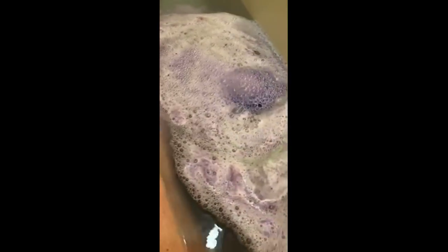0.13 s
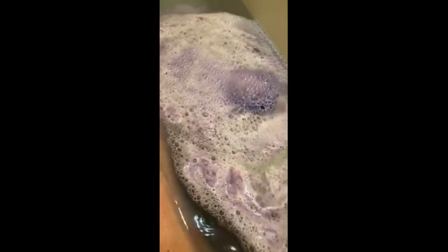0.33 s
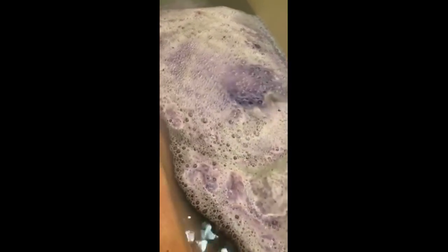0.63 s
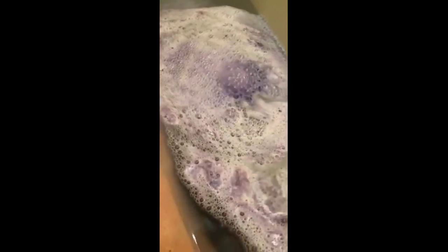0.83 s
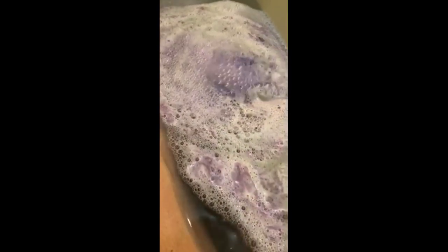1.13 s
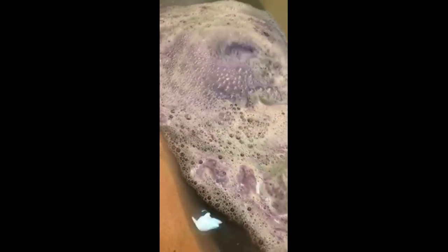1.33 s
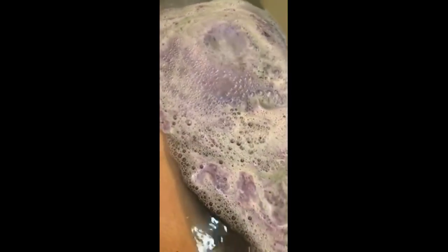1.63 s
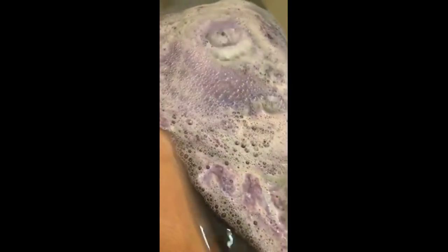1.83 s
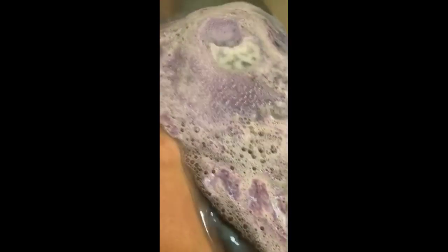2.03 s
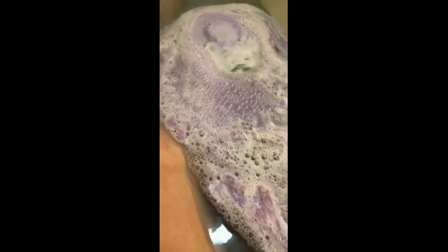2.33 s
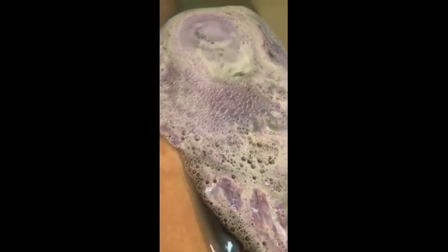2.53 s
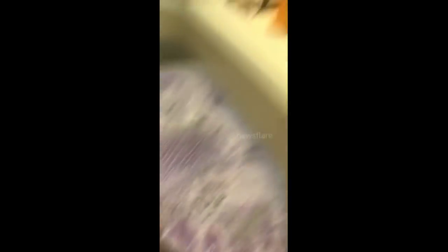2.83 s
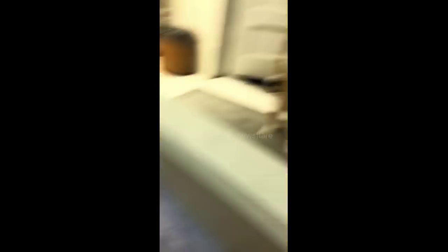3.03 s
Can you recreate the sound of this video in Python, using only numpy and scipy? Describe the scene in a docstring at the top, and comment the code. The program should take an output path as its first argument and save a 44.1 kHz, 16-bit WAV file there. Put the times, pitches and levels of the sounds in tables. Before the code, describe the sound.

A bath bomb fizzes in a foamy tub, with light knocks on the microphone.

```python
"""A foamy tub at home, with a bath bomb fizzing in it. Countless tiny bubbles burst, each ringing
a few cycles: bright on top of the foam, duller within the tub, over a low wash of noise.
A household rumble and a wavering hum lie below. The hand holding the microphone shifts, changing
the colour of the fizz; dull thumps and, late on, two taps and a creak carry through the case."""
import sys
import numpy as np
from scipy import signal
from scipy.fft import rfft, irfft
from scipy.io import wavfile

SR = 44100
rng = np.random.default_rng(int(sys.argv[2]) if len(sys.argv) > 2 else 0)


def transcribe(u):
    """Save the signal u as a 16-bit wav file named by the first command-line argument.

    u: samples, shape (n,) or (channels, n), limited to [-1, 1]; the rate is SR.
    q: integer samples, one column per channel.
    """
    v = np.clip(np.atleast_2d(u).T, -1, 1)
    q = np.round(v * 32767).astype(np.int16)
    wavfile.write(sys.argv[1], SR, q)


N = 140238


def from_db(db):
    """Level to amplitude gain."""
    return 10 ** (np.asarray(db) / 20)


def unit_rms(x):
    """Scale to rms 1."""
    return x / np.sqrt(np.mean(x ** 2) + 1e-20)


def per_sample(rows):
    """Interpolate each column after t/s to one value per sample."""
    times_s, *columns = np.transpose(rows)
    return [np.interp(np.arange(N) / SR, times_s, column) for column in columns]


def drift(corner_hz):
    """Slow random wander, rms about 1."""
    hop, settle = 40, 2000
    pole = np.exp(-2 * np.pi * corner_hz * hop / SR)
    noise = rng.standard_normal(N // hop + settle + 2)
    slow = signal.lfilter([1], [1, -2 * pole, pole * pole], noise)[settle:]
    return np.interp(np.arange(N) / hop, np.arange(len(slow)), unit_rms(slow))


def ring(drive, hz, t60_s):
    """Resonator: a unit click starts a decaying sine of height 1."""
    r, w = from_db(-60 / (t60_s * SR)), 2 * np.pi * hz / SR
    return signal.lfilter([0, np.sin(w)], [1, -2 * r * np.cos(w), r * r], drive + 1e-18)


def coloured(x, spectrum, skirt_db_oct):
    """Filter by a spectrum, rolling off beyond its ends; rms 1."""
    hz, db = np.transpose(spectrum)
    octave = np.log2(np.arange(1, N // 2 + 2) * SR / N)
    beyond = np.maximum(np.log2(hz[0]) - octave, 0) + np.maximum(octave - np.log2(hz[-1]), 0)
    gain_db = np.interp(octave, np.log2(hz), db) - skirt_db_oct * beyond
    return unit_rms(irfft(rfft(x) * from_db(gain_db), N))


RUMBLE_LEVEL = [(0.0, -59.5), (0.13, -56.5), (0.45, -58.5), (0.75, -53), (0.8, -62.5), (0.95, -55.5),
                (1.04, -54), (1.06, -59), (1.3, -56.5), (1.5, -56.5), (1.66, -55), (1.7, -62.5),
                (1.91, -55.5), (2.04, -57), (2.55, -59.5), (2.61, -55.5), (3.13, -57.5), (3.18, -51.5)]  # t/s, level/dB
RUMBLE_SPECTRUM = [(11, -3), (18, -12), (43, 0.5), (59, 4), (102, -10), (129, -7), (170, -19.5), (220, -38),
                   (370, -120)]  # f/Hz, relative level/dB
def rumble():
    """Household rumble: low noise of uneven level."""
    level_db, = per_sample(RUMBLE_LEVEL)
    return from_db(level_db) * coloured(rng.standard_normal(N), RUMBLE_SPECTRUM, skirt_db_oct=20)


HUM_LEVEL = [(0.0, -86), (0.06, -93), (0.31, -69.5), (0.81, -91), (0.97, -65.5), (1.27, -72.5), (1.4, -81),
             (2.1, -81.5), (2.27, -63.5), (2.44, -73), (2.49, -67), (2.53, -80), (3.18, -84)]  # t/s, level/dB
HUM_RESONANCES = [(247.6, 11, -0.5), (127.4, 11.6, -3.5)]  # f/Hz, nominal width/Hz, relative level/dB
def hum():
    """Household hum: two wavering tones of narrow-band noise."""
    level_db, = per_sample(HUM_LEVEL)
    tones = sum(from_db(db) * unit_rms(ring(rng.standard_normal(N), hz, t60_s=3.7 / width_hz))
                for hz, width_hz, db in HUM_RESONANCES)
    return from_db(level_db) * tones


CASE_THUMPS = [(0.925, -53, 55, 0.15), (1.005, -46.5, 74, 0.13), (0.984, -63.5, 377, 0.25),
               (1.542, -48, 58, 0.11), (1.578, -51, 106.7, 0.19), (1.742, -64, 301, .012),
               (1.743, -54.5, 600, 0.018), (2.628, -62, 600, 0.046), (2.825, -49, 95, .08),
               (2.884, -51.5, 480, 0.017), (2.914, -47.5, 170, 0.039), (2.971, -47, 35, 0.12),
               (3.164, -47.5, 114, 0.049)]  # t/s, drive level/dB, f/Hz, t60/s
def thumps():
    """Handling thumps: a half-cycle push rings a damped resonance of the case."""
    out = np.zeros(N)
    for start_s, db, hz, t60_s in CASE_THUMPS:
        start, width = int(start_s * SR), int(SR / hz / 2)
        push = np.zeros(N)
        push[start:start + width] = from_db(db) * 4 * np.hanning(width) / width
        out += ring(push, hz, t60_s)
    return out


FINGER_TAPS = [(2.8009, -34, 630, 320, 0.003), (3.1597, -40, 1400, 1100, 0.0018)]  # at the peak: t/s, level/dB, f/Hz; then period growth/(1/s), rise/s
def taps(sharpness=3.3):
    """Fingers tap the case: each a brief falling chirp."""
    out, t = np.zeros(N), np.arange(N) / SR
    for peak_s, db, hz, growth_per_s, rise_s in FINGER_TAPS:
        since_s = np.clip(t - peak_s, -rise_s, 6 * rise_s)
        age = 1 + since_s / rise_s
        envelope = (age * np.exp(1 - age)) ** sharpness * (t - peak_s < 6 * rise_s)
        period_ratio = np.maximum(1 + growth_per_s * since_s, .02)
        phase = 2 * np.pi * hz * np.log(period_ratio) / growth_per_s
        out -= from_db(db) * envelope * np.cos(phase)
    return out


CASE_CREAK = [(3.1, 0.029, 228, -54.5)]  # t/s, length/s, f/Hz, level/dB
def creak(wobble=.03, octave_db=-1.5):
    """The case creaks in the hand: a short, unsteady tone and its octave."""
    out, t = np.zeros(N), np.arange(N) / SR
    for start_s, length_s, hz, db in CASE_CREAK:
        phase = 2 * np.pi * hz * np.cumsum(1 + wobble * drift(corner_hz=60)) / SR
        envelope = from_db(db) * np.sin(np.pi * np.clip((t - start_s) / length_s, 0, 1))
        out += envelope * (np.sin(phase) + from_db(octave_db) * np.sin(2 * phase))
    return out


HAND_SHIFT = [(0, 0.02), (.8, 0.14), (1.5, .15), (2.0, 0.76), (2.6, 0.58), (3.18, 0.97)]  # t/s, share of late spectrum/(0-1)
def hand_shift(x, early, late, skirt_db_oct):
    """Crossfade from the early to the late spectrum as the hand moves."""
    share, = per_sample(HAND_SHIFT)
    return (1 - share) * coloured(x, early, skirt_db_oct) + share * coloured(x, late, skirt_db_oct)


def bursts(per_s, early, late, patchy_db, size_count=14, t60_cycles=4.96):
    """Bubbles burst at random and ring briefly; each size swells and fades on its own."""
    strength_db = -np.minimum(rng.exponential(1, N), 5)
    polarity = rng.choice([-1, 1], N)
    clicks = from_db(strength_db) * polarity * (rng.random(N) < per_s / SR)
    sizes = rng.integers(0, size_count, N)
    pops = np.zeros(N)
    for size, hz in enumerate(np.geomspace(early[0][0], early[-1][0], size_count)):
        ringing = unit_rms(ring(clicks * (sizes == size), hz, t60_cycles / hz))
        patches = from_db(patchy_db * drift(corner_hz=8.8))
        pops += np.sqrt(hz) * ringing * patches  # sqrt: equal power per Hz
    return hand_shift(pops, early, late, skirt_db_oct=53)


TUB_LEVELS = [(0.0, -60, -65), (0.42, -57.5, -63.5), (0.79, -58.5, -65), (1.12, -57.5, -64),
              (1.5, -60.5, -65.5), (1.96, -59, -67), (2.22, -59, -65), (2.42, -58.5, -65.5),
              (2.83, -59, -67), (3.18, -57.5, -64.5)]  # t/s, bubble level/dB, wash level/dB
# Spectra: f/Hz, relative level/dB
TUB_EARLY, TUB_LATE = [(790, -29), (1350, -16.5), (1520, -8), (1700, -4.5), (1910, 0.5), (2030, -1),
                       (2120, -9), (2230, -1), (2290, 3.5), (2370, -2.5), (2460, -5), (2690, -6),
                       (2790, -6.5), (2920, -6.5), (3030, 2.5), (3120, -8), (3260, -4.5), (3680, -10),
                       (3900, -17), (5070, -42), (8580, -120)], [(790, -55), (1350, -17), (1560, -11.5), (1710, -4), (1860, -9),
                                           (2060, -3), (2240, -13), (2490, -4.5), (3340, -5.5),
                                           (3620, -3.5), (3900, 0), (5070, -34), (8580, -120)]
WASH_EARLY, WASH_LATE = [(88, -22), (150, -2.5), (214, -4.5), (251, -2.5), (338, -8), (371, -3), (404, -9),
                         (460, -4), (501, -9.5), (582, -2.5), (690, -5.5), (784, -12.5), (1220, -8.5),
                         (1400, -19), (1820, -45), (3080, -120)], [(88, -28), (150, -11), (204, -2), (248, -2.5), (345, -10),
                                              (393, -8), (506, -11), (615, -10), (945, -14.5), (1320, -14),
                                              (1400, -11.5), (1820, -42), (3080, -120)]
def tub_bubbles():
    """Larger, duller bubbles burst within the tub, over a low wash of noise."""
    bubble_db, wash_db = per_sample(TUB_LEVELS)
    bubbles = bursts(per_s=16000, early=TUB_EARLY, late=TUB_LATE, patchy_db=1.66)
    flutter_db = 1.07 * drift(corner_hz=11.7)
    wash = hand_shift(rng.standard_normal(N), WASH_EARLY, WASH_LATE, skirt_db_oct=25)
    return from_db(bubble_db) * bubbles + from_db(wash_db + flutter_db) * wash


SIZZLE_BAND = [(0.0, 5830, -66), (0.06, 6090, -67), (0.8, 6040, -67), (1.05, 6410, -58.5),
               (1.32, 6460, -59), (1.55, 6400, -61), (1.81, 6064, -65), (2.5, 6150, -66), (2.62, 6230, -60),
               (2.85, 6020, -60), (2.9, 6040, -62), (3.0, 6060, -61), (3.18, 5820, -56.5)]  # t/s, centre f/Hz, level/dB
def sizzle(width_hz=300):
    """A narrow noise band in the fizz, wandering near 6 kHz."""
    centre_hz, level_db = per_sample(SIZZLE_BAND)
    lowpass = signal.butter(2, width_hz / 2, fs=SR, output="sos")
    in_phase, quadrature = signal.sosfilt(lowpass, rng.standard_normal((2, N)))
    phase = 2 * np.pi * np.cumsum(centre_hz) / SR
    return from_db(level_db) * unit_rms(in_phase * np.cos(phase) + quadrature * np.sin(phase))


FIZZ_LEVELS = [(0.0, -49, -62), (0.03, -51, -62), (0.53, -51, -60), (0.88, -53, -63), (1.15, -51, -60.5),
               (1.96, -51.5, -59.5), (2.04, -52, -58.5), (2.09, -50, -58.5), (2.16, -50.5, -59.5),
               (2.4, -49, -57.5), (2.62, -49, -58.5), (2.85, -49, -58.5), (2.89, -51.5, -59),
               (2.99, -50, -58), (3.18, -53.5, -59.5)]  # t/s, body level/dB, treble level/dB
# Spectra: f/Hz, relative level/dB
FIZZ_EARLY, FIZZ_LATE = [(2000, -27), (2900, -15.5), (3400, -9), (3670, -15.5), (4000, -6.5), (4180, -8),
                         (4400, -8.5), (4600, -7.5), (4850, -6), (5260, -5.5), (6390, -3), (8260, -9),
                         (9000, -16), (11700, -20), (19800, -120)], [(2000, -16.5), (3400, -11.5), (3630, -17.5), (4410, -4),
                                              (4830, -6.5), (5210, -1.5), (6060, -2), (6550, -4),
                                              (7460, -4), (9000, -16), (11700, -24), (19800, -120)]
TREBLE_SPECTRUM = [(5000, -31), (8500, -8), (10500, -6.5), (12300, -9.5), (13500, -11), (14300, -26.5),
                   (15200, -19.5), (16500, -27)]
def foam_fizz(per_s=42000, patchy_db=1.4):
    """Tiny bubbles burst on top of the foam, in two layers: a bright body and its treble."""
    body_db, treble_db = per_sample(FIZZ_LEVELS)
    body = bursts(per_s, FIZZ_EARLY, FIZZ_LATE, patchy_db)
    treble = bursts(per_s, TREBLE_SPECTRUM, TREBLE_SPECTRUM, patchy_db)
    return from_db(body_db) * body + from_db(treble_db) * treble


def scene():
    """Mono mix of bath bomb, house and handling."""
    bath_bomb = foam_fizz() + tub_bubbles() + sizzle()
    house = rumble() + hum()
    handling = taps() + thumps() + creak()
    return (bath_bomb + house + handling)[None]


def record(dry):
    """Steep elliptic low-pass."""
    cutoff_hz = 16000
    return signal.sosfilt(signal.ellip(12, .5, 70, cutoff_hz, fs=SR, output="sos"), dry)


dry = scene()
out = record(dry)
transcribe(out)
```